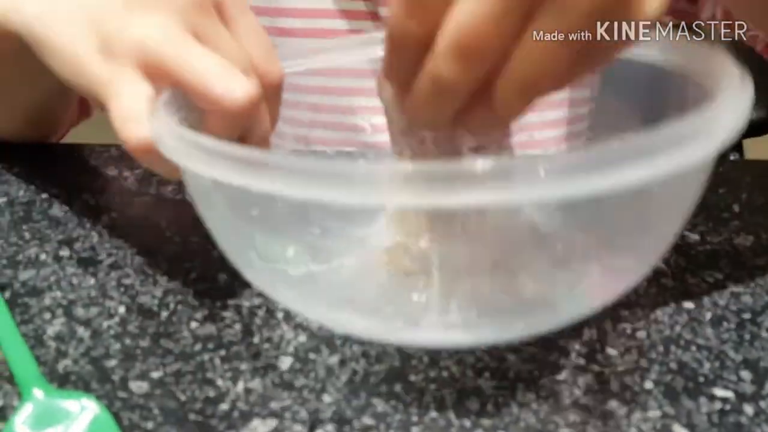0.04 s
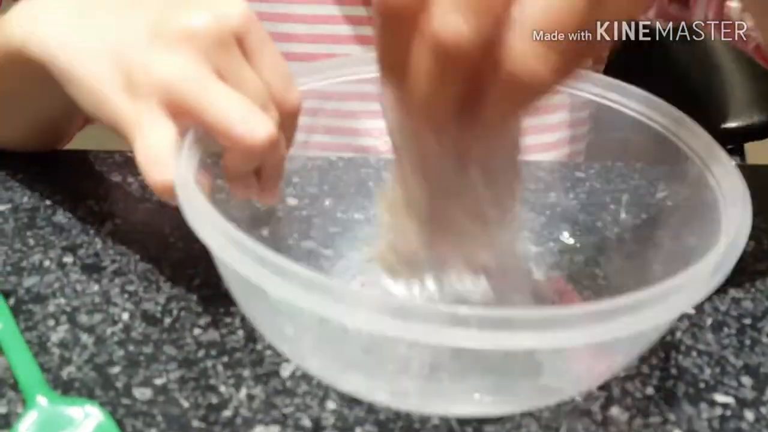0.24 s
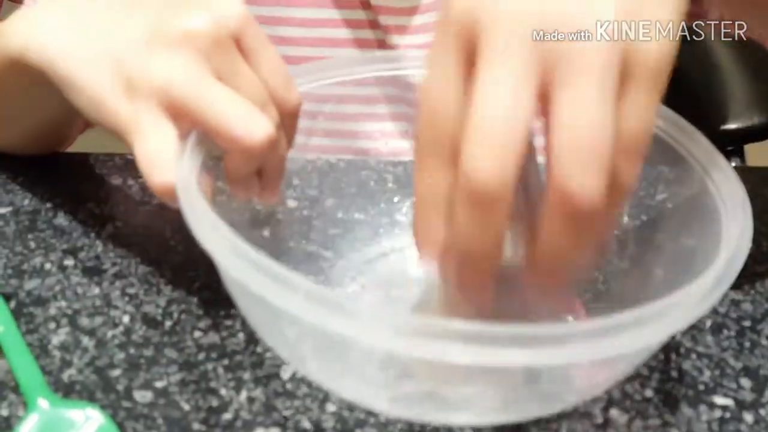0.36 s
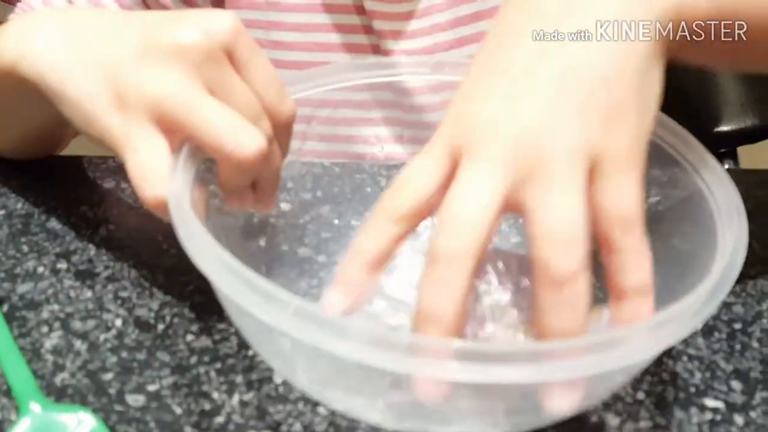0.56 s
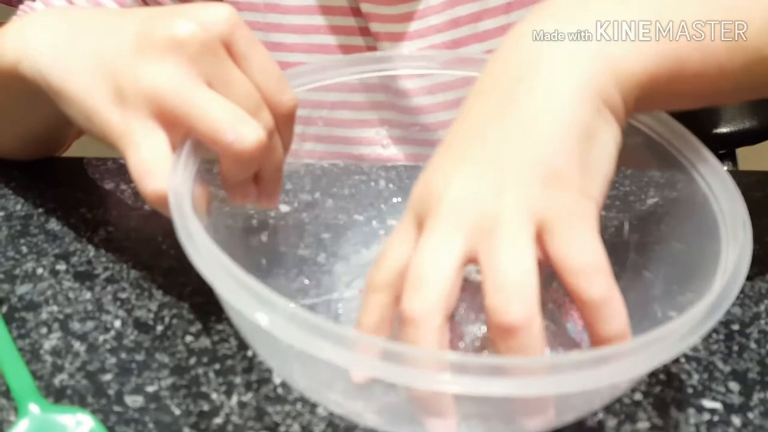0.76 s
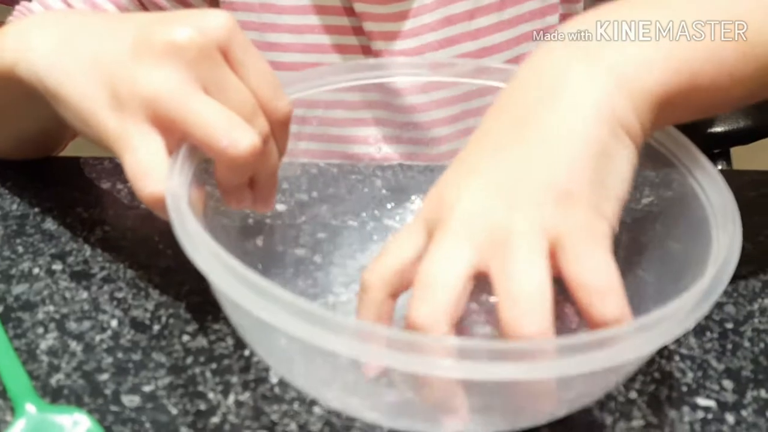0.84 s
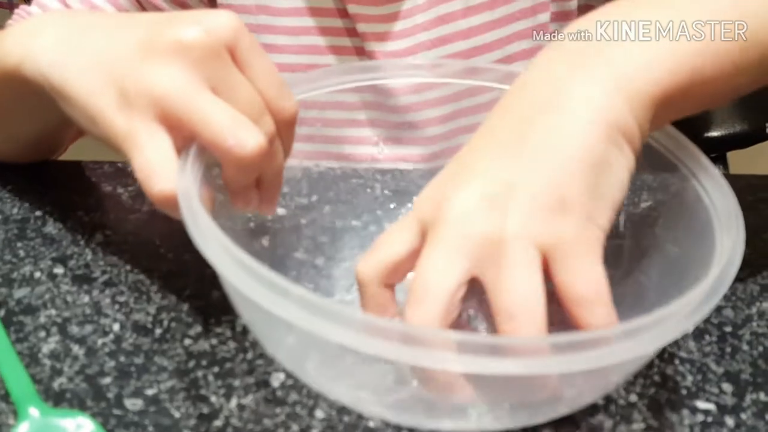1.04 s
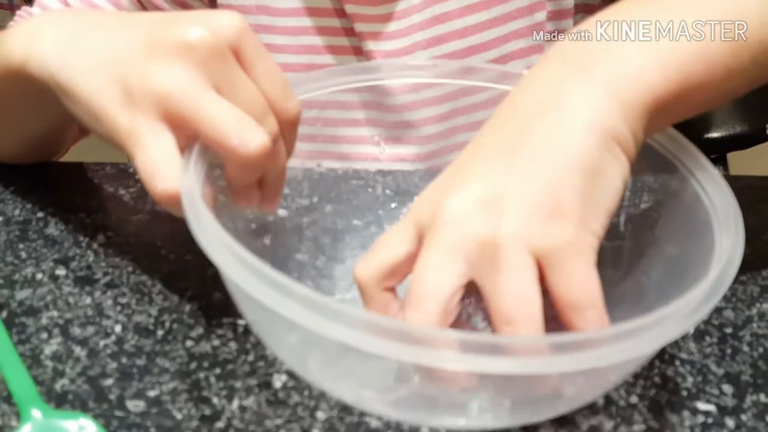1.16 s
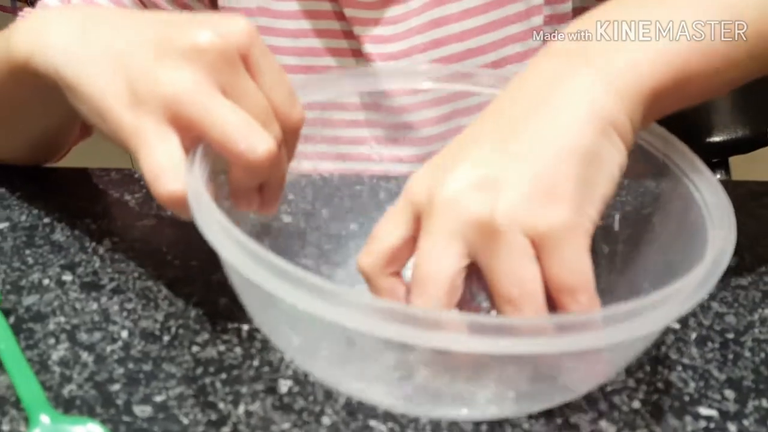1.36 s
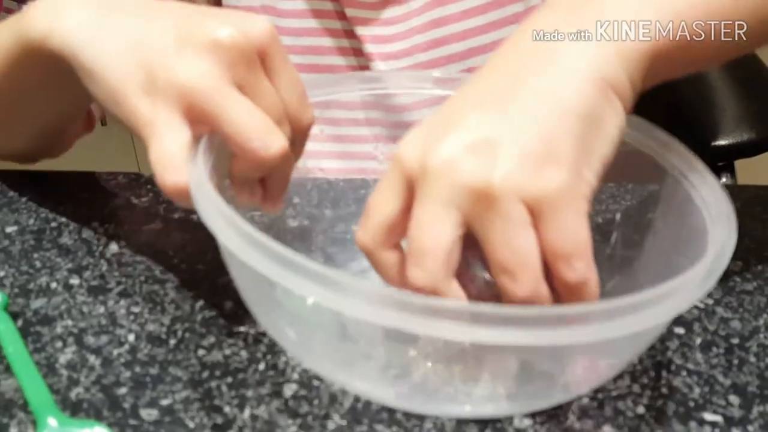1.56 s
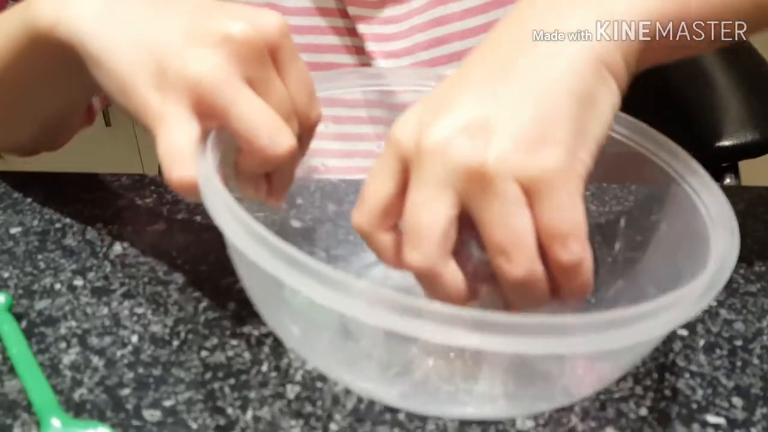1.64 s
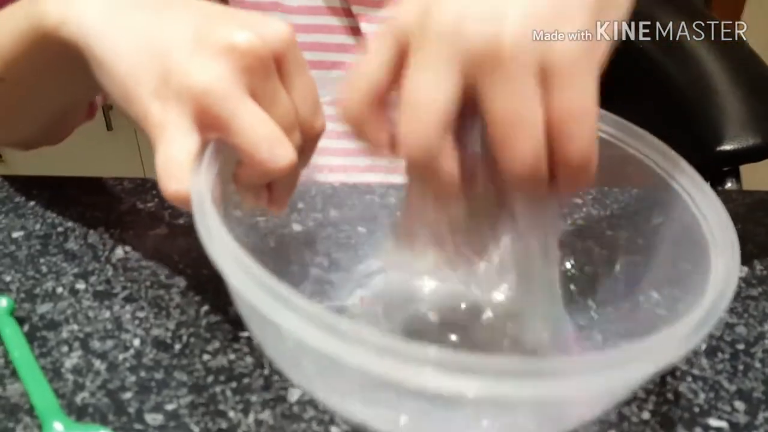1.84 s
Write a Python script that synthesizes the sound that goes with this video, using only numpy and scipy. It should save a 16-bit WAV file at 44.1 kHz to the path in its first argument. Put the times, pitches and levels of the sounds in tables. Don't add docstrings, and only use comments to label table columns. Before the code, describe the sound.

Slime being kneaded in a thin plastic bowl on a stone counter. Tiny ticks and grainy rubs lead to a loud, sharp pop at 0.22 s, with a hollow bowl ring and low thump. Soft pushes and clicks follow, with snaps at 0.84 and 1.02 s. Short wet squelches start near 1.15 s, a knock lands at 1.6 s, then sticky rubs and crackle grow until the end. Close stereo, small live kitchen, faint hum and hiss.

```python
import sys
import numpy as np
from scipy import signal
from scipy.fft import rfft, irfft, next_fast_len
from scipy.io import wavfile

SR = 44100
rng = np.random.default_rng(int(sys.argv[2]) if len(sys.argv) > 2 else 0)


def waveform_to_disk(signal):
    frames = np.transpose(np.atleast_2d(signal))
    scaled = np.clip(frames, -1, 1) * 32767
    samples = np.round(scaled).astype(np.int16)
    wavfile.write(sys.argv[1], SR, samples)


def rack_gain(trim_db):
    fader = np.asarray(trim_db, float)
    return 10 ** (fader / 20)


N = 83790

# f/Hz, level/dB, t60/s
BOWL_LOW = [(215, -8, .08), (250, -5, .08), (308, -7, .07), (370, 0, .085), (405, -5, .07), (460, -6, .09),
            (520, -8, .08), (590, -8, .05)]
# f/Hz, level/dB, t60/s
BOWL_HIGH = [(840, -13, .1), (933, -9, .14), (985, -12, .1), (1013, 0, .085), (1058, -7, .08),
             (1308, -14, .09), (1465, -17, .08), (2290, -14, .04), (2770, -18, .04)]
# f/Hz, left-right likeness/1
CLICK_LIKENESS = [(500, 0.98), (3000, 0.22), (9000, 0.38)]
# f/Hz, left-right likeness/1
DIFFUSE_LIKENESS = [(100, 0.71), (400, 0.73), (1500, 0.19), (8000, 0.015)]
WALL_RISE_S = .0007


def knocks():
    # t/s, then peak level/dB of click, low wall, high wall, counter thump
    bursts = [(0.2243, -12, -10.5, -14, -14.5), (0.2378, -33, -22, -29, -47), (0.257, -44, -25.5, -41, -55),
              (0.496, -38.5, -46.5, -52, -40.5), (0.8384, -29.5, -38.5, -40, -29.5),
              (.863, -51, -64, -48.5, -68), (0.888, -58, -44.5, -50, -51),
              (1.0186, -23, -35.5, -34.5, -32.5), (1.023, -30, -45, -69, -38),
              (1.0451, -49, -44, -38.5, -37), (1.6012, -25.5, -29, -31, -25),
              (1.617, -38.5, -28.5, -38.5, -25)]
    # f/Hz, level/dB, t60/s
    counter = [(75, -9, .08), (100, -6, .08), (130, -1, .09), (153, 0, .11)]
    travel_s, counter_rise_s = .0011, .003
    out, t = timeline()
    for s, click_db, low_db, high_db, thump_db in bursts:
        blow = rack_gain(click_db) * click(t)
        blow = blow + rack_gain(low_db) * ring(BOWL_LOW, t, WALL_RISE_S)
        blow = blow + rack_gain(high_db) * ring(BOWL_HIGH, t, WALL_RISE_S)
        blow = blow + rack_gain(thump_db) * ring(counter, t, counter_rise_s)
        add(out, s + travel_s, heard(blow))
    return out[:, :N]


def ticks():
    # t/s, click level/dB, pocket level/dB, pocket f/Hz, wall level/dB
    bursts = [(0.044, -58, -46, 845, -67), (0.0609, -46.5, -32.5, 1480, -53.5),
              (0.1198, -54.5, -61, 2100, -66), (0.1798, -58, -38, 1700, -66), (0.192, -58, -43, 1670, -47),
              (0.2272, -21.5, -10, 2530, -25.5), (0.44, -49.5, -58, 2500, -45.5),
              (0.4676, -59, -46, 11000, -62), (0.531, -70, -43, 3600, -64), (0.601, -45, -40, 3320, -55),
              (0.6516, -59, -49, 3000, -70), (0.7235, -50, -47, 2510, -55), (0.778, -47, -47, 2880, -74),
              (.788, -35, -25.5, 3530, -44), (1.166, -62, -47, 3500, -61), (1.179, -65, -49, 3600, -64),
              (1.2025, -49, -38, 3730, -60), (1.212, -46, -39, 666, -51), (1.2228, -60, -43, 3700, -64),
              (1.2325, -57, -34, 3600, -66), (1.2692, -42.5, -56, 2620, -64), (1.364, -56, -49, 1030, -53),
              (1.3739, -57, -44.5, 1930, -59), (1.511, -46, -41, 2140, -50), (1.625, -41, -52, 9000, -68),
              (1.738, -47, -33.5, 2130, -54), (1.782, -45, -49, 6300, -54), (1.798, -54, -30, 1580, -62),
              (1.832, -52, -46, 2970, -51)]
    pocket_cycles = 10
    out, t = timeline()
    for s, click_db, pocket_db, pocket_hz, wall_db in bursts:
        pocket = ring([(pocket_hz, 0, pocket_cycles / pocket_hz)], t, WALL_RISE_S / 10)
        wall = ring([*BOWL_LOW, *BOWL_HIGH], t, WALL_RISE_S)
        add(out, s, heard(rack_gain(click_db) * click(t) + rack_gain(pocket_db) * pocket + rack_gain(wall_db) * wall))
    return out[:, :N]


def click(t):
    # f/Hz, level/dB per Hz
    snap = [(900, 16), (1600, 9), (2500, 13.5), (3900, 14.5), (5300, -0.5), (6300, 1), (10000, 0.5),
            (16000, -10)]
    noise = pair(CLICK_LIKENESS, len(t))
    t60_s = 0.01
    return rack_gain(-60 * t / t60_s) * unit(filtered(noise, lambda hz: rack_gain(along(snap, hz))))


def notes():
    # t/s, level/dB, f/Hz, t60/s
    tones = [(.2255, -20, 1015, 0.064), (.2255, -27, 557, 0.049), (0.2253, -21, 6100, 0.0083),
             (0.2275, -27, 1385, .03), (.2255, -26.5, 108.6, 0.22), (.285, -36.5, 989, 0.16),
             (.34, -36.5, 1030, 0.1), (.395, -40.5, 928, 0.05), (.864, -50.5, 1020, .08),
             (1.02, -33.5, 1001, 0.082), (1.0195, -36, 406, .06), (1.0205, -36, 630, 0.068),
             (1.0444, -44.5, 1030, .07), (1.0452, -29, 243, 0.018), (1.083, -51.5, 984, 0.17),
             (1.511, -44, 663, 0.037), (1.565, -52, 690, 0.081), (1.6025, -35.5, 996, 0.068),
             (1.6025, -28, 346.4, 0.07), (1.6025, -24, 4820, .007), (1.63, -45, 993, .15),
             (1.737, -43.5, 680, 0.082), (.839, -38, 620, 0.033), (.9, -46, 256, 0.117),
             (1.36, -53.5, 299, 0.16), (1.43, -52.5, 249, 0.12), (0.329, -41, 241, .2),
             (.47, -50.5, 251.5, 0.17)]
    return heard(single_modes(tones, rise_s=0.0004))


def rubs():
    # t/s, length/s, level/dB, tilt/dB per octave, squelch f/Hz
    strokes = [(0.059, 0.011, -52, -5, 11200), (.075, .02, -65, 18, 11000), (0.178, 0.011, -50, 3.5, 1660),
               (0.189, 0.017, -46.5, 1.5, 1630), (0.203, 0.06, -42, -1, 1500), (0.407, 0.034, -54, 0, 1126),
               (0.451, 0.045, -64, 14, 12400), (0.518, 0.027, -57, 1, 3600),
               (0.596, 0.069, -61.5, -7, 3500), (0.837, 0.039, -53, 0.5, 3840),
               (1.045, 0.027, -57.5, 6, 7040), (1.158, 0.047, -59.5, 5, 3600),
               (1.194, 0.047, -56, -1, 1420), (1.196, 0.01, -55.5, 4, 3500), (1.209, .02, -57.5, 4.5, 3660),
               (1.23, 0.015, -53.5, 1.5, 1630), (1.355, 0.062, -65.5, 1, 1030),
               (1.511, 0.085, -63, 0.5, 2000), (1.511, 0.055, -70, -13, 667),
               (1.613, 0.046, -66, 11, 12700), (1.654, 0.16, -55.5, 0, 2170), (1.726, 0.19, -65, -5.5, 673),
               (1.781, 0.0347, -47, 0.5, 1170), (1.823, 0.025, -45.5, 0.5, 3040),
               (1.843, 0.016, -51.5, 1, 1120), (1.884, .04, -43, 4, 2840)]
    # f/Hz, width/Hz, level/dB
    rub_body = [(283, 800, 0.5), (1030, 600, 3.5), (2280, 67, -5), (3600, 2600, -10.5), (9000, 21000, -23)]
    grains_per_s, edge_s = 6000, .004
    squelch_blur_hz, squelch_db = 10000, 3
    out, t = timeline()
    body = resonances(rub_body)
    for s, length, db, tilt_db, squelch_hz in strokes:
        chance, size_draw = rng.random((2, len(t)))
        grains = (chance < grains_per_s / SR) * grain_sizes(size_draw) * pair(CLICK_LIKENESS, len(t))
        cavity = resonances([(squelch_hz, squelch_hz ** 2 / squelch_blur_hz, squelch_db)])

        def colour(hz):
            tilt = rack_gain(tilt_db * np.log2((hz + 400) / 2400))
            return body(hz) * tilt + cavity(hz)

        stroke = np.clip(np.minimum(t, length - t) / edge_s, 0, 1)
        add(out, s, heard(rack_gain(db) * stroke * unit(filtered(grains, colour))))
    return out[:, :N]


def thuds():
    # t/s, level/dB, f/Hz, t60/s
    pushes = [(0.124, -64, 110, .1), (0.274, -27.5, 168, 0.14), (0.358, -57, 102, .1),
              (0.417, -38, 74, 0.14), (0.493, -41.5, 85, 0.13), (0.605, -40.5, 161.5, 0.096),
              (.715, -42, 158, 0.13), (0.784, -38, 126.5, 0.15), (0.887, -27.5, 103, 0.046),
              (1.044, -39, 93, 0.13), (1.13, -41, 68.3, 0.1), (1.205, -39, 129.2, 0.31),
              (1.292, -56, 136, 0.15), (1.327, -57, 65.4, 0.26), (1.394, -38, 111, 0.07),
              (1.505, -39, 107, 0.056), (1.65, -34.5, 237, 0.096), (1.721, -54, 131, 0.089),
              (1.792, -47, 84, 0.14)]
    return single_modes(pushes, rise_s=0.0074)


def creep():
    # t/s, level/dB
    swell = [(0, -63.5), (.17, -69.5), (.5, -62), (.76, -66), (.9, -59.5), (1.1, -60), (1.261, -64.5),
             (1.3, -71), (1.5, -71), (1.7, -65), (1.9, -51)]
    # f/Hz, level/dB per Hz
    crackle_colour = [(300, -39), (700, 2), (1600, 1.5), (3500, -5), (6000, -10.5), (15000, -17.5)]
    grains = grain_sizes(rng.random(N)) * pair(DIFFUSE_LIKENESS, N)
    crackle = unit(filtered(grains, lambda hz: rack_gain(along(crackle_colour, hz))))
    s, db = np.transpose(swell)
    return rack_gain(np.interp(np.arange(N) / SR, s, db)) * crackle


def hum():
    # f/Hz, level/dB per Hz
    hum_colour = [(15, -40), (25, 6), (149, -1.5), (545, -12.5), (2110, -25), (2350, -13.5), (2760, -27),
                  (4740, -34.5), (16000, -30)]
    noise = pair(DIFFUSE_LIKENESS, N)
    return rack_gain(-57.5) * unit(filtered(noise, lambda hz: rack_gain(along(hum_colour, hz))))


def heard(x):
    # f/Hz, left over right level/dB
    lean = [(250, 1.5), (600, 0.5), (1050, -4.5), (2500, 5), (5000, -0.5), (12000, -2)]
    # f/Hz, t60/s
    decay = [(100, 0.37), (400, 0.39), (1500, 0.44), (5000, 0.37), (13000, 0.38)]
    # f/Hz, level/dB
    tail_colour = [(100, -1.5), (1000, 0.5), (3000, 3), (7000, 0.5), (15000, 2)]
    wet_db, first_wall_s = -7, .004
    sides = np.array([[.5], [-.5]])
    direct = filtered(x, lambda hz: rack_gain(sides * along(lean, hz)))
    hz, t, z = signal.stft(pair(DIFFUSE_LIKENESS, SR // 2), SR, nperseg=256)
    fade = rack_gain(-60 * t / along(decay, hz)[:, None])
    tail = signal.istft(z * fade, SR, nperseg=256)[1]
    tail = tail / np.linalg.norm(tail[0])
    tail = filtered(tail, lambda hz: rack_gain(along(tail_colour, hz) + wet_db))
    late = np.pad(x, ((0, 0), (round(first_wall_s * SR), 0)))
    return direct + signal.fftconvolve(late, tail, axes=1)[:, :x.shape[1]]


def ring(modes, t, attack_s):
    # f/Hz, phase/rad
    port_phase = [(150, .22), (350, .65), (600, 1.3), (5000, 1.4)]
    scatter_db, wander = 2, .06
    hz, db, t60 = np.transpose(modes)[..., None]
    strength = rack_gain(db + scatter_db * rng.standard_normal(hz.shape))
    steps = rng.standard_normal((len(hz), len(t)))
    walk = wander * np.cumsum(steps, 1) * np.sqrt(hz / SR)
    flip = (-1) ** np.arange(len(hz))[:, None]
    turn = np.array([.5, -.5])[:, None, None] * along(port_phase, hz) * flip
    tones = strength * rack_gain(-60 * t / t60) * np.sin(2 * np.pi * hz * t + walk + turn)
    return tones.sum(1) * (1 - np.exp(-t / attack_s)) / np.linalg.norm(strength)


def single_modes(events, rise_s):
    out, t = timeline()
    for s, db, hz, t60 in events:
        add(out, s, rack_gain(db) * ring([(hz, 0, t60)], t, rise_s))
    return out[:, :N]


def grain_sizes(draw):
    spread_db, biggest = 3, .02
    return rack_gain(-spread_db * np.log(draw + biggest))


def pair(alike, n):
    def mid_side(hz):
        turn = np.arccos(np.clip(along(alike, hz), -1, 1)) / 2
        return np.array([np.cos(turn), np.sin(turn)])

    mid, side = filtered(rng.standard_normal((2, n)), mid_side)
    return np.array([mid + side, mid - side])


def resonances(peaks):
    def response(f):
        total = 0
        for k, (centre, width, db) in enumerate(peaks):
            damping = 1j * f * width
            total = total + (-1) ** k * rack_gain(db) * damping / (centre * centre - f * f + damping)
        return total

    return response


def filtered(x, response):
    n = x.shape[-1]
    m = next_fast_len(n + 8192)
    return irfft(rfft(x, m) * response(np.fft.rfftfreq(m, 1 / SR)), m)[..., :n]


def along(points, hz):
    f, v = np.transpose(points)
    return np.interp(np.log(hz + 1), np.log(f + 1), v)


def unit(x):
    return x / np.sqrt(np.mean(x ** 2) + 1e-20)


def timeline():
    return np.zeros((2, N + SR)), np.arange(SR // 2) / SR


def add(out, s, x):
    i = round(s * SR)
    out[:, i:i + x.shape[1]] += x


def scene():
    return knocks() + ticks() + notes() + rubs() + thuds() + creep() + hum()


def top_cut(x):
    return signal.sosfilt(signal.butter(12, 16500, fs=SR, output="sos"), x)


def record(dry):
    low_hz, top_hz, offset = 50, 15100, -.001

    def microphone(hz):
        bass_cut = (1j * hz / (low_hz + 1j * hz)) ** 4
        return bass_cut / np.sqrt(1 + (hz / top_hz) ** 60)

    return top_cut(filtered(dry, microphone) + offset)


dry = scene()
out = record(dry)
waveform_to_disk(out)
```